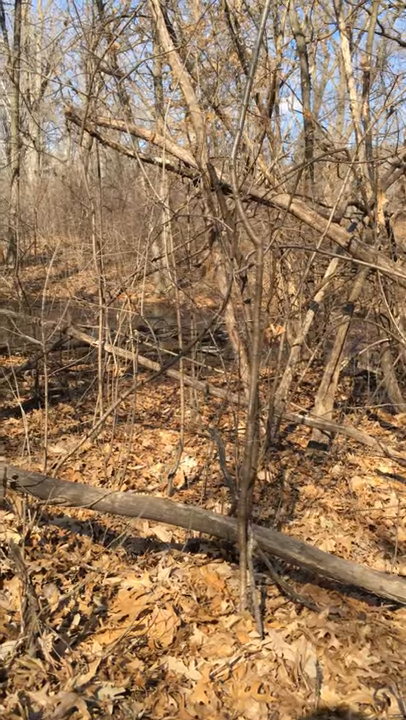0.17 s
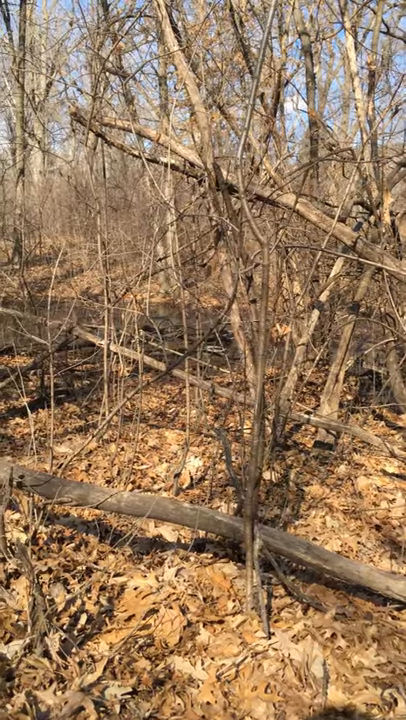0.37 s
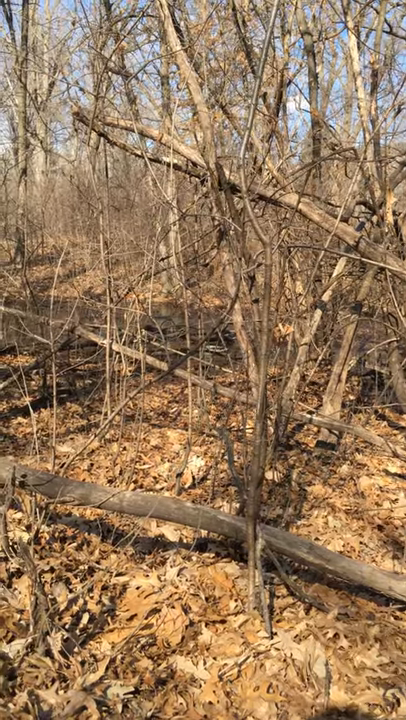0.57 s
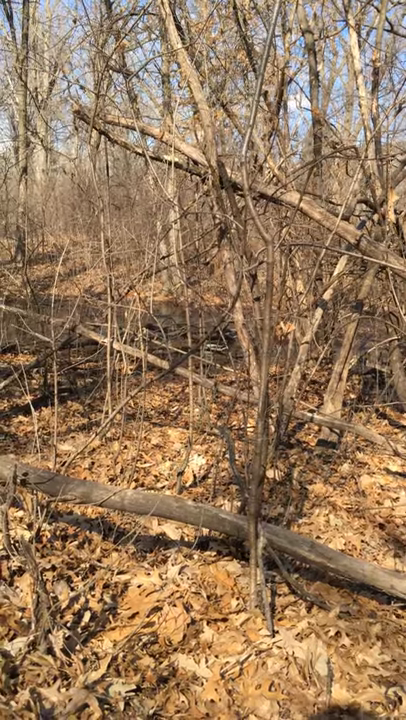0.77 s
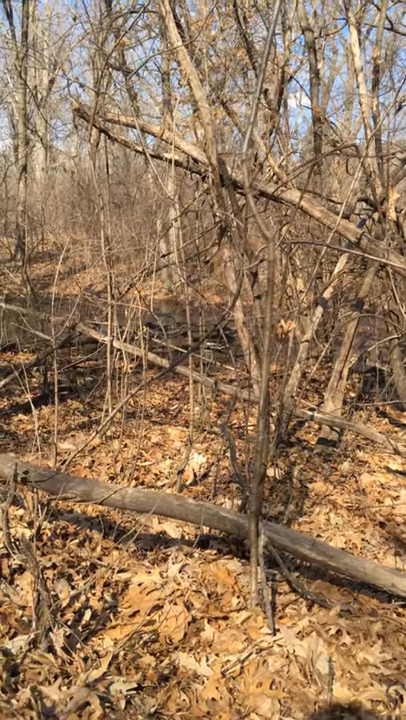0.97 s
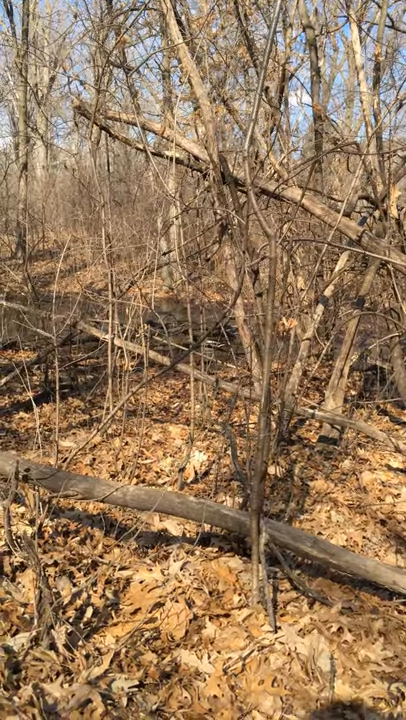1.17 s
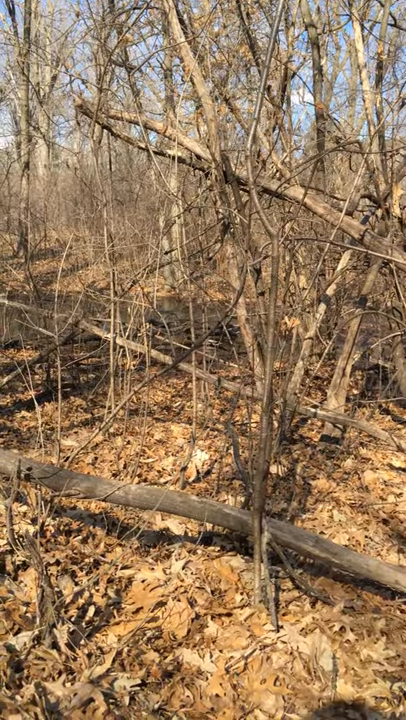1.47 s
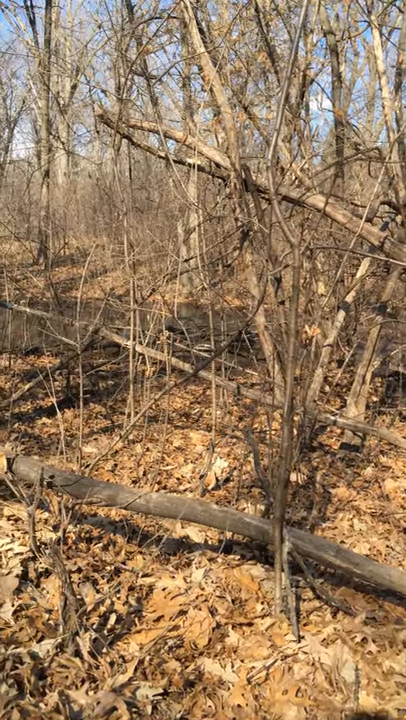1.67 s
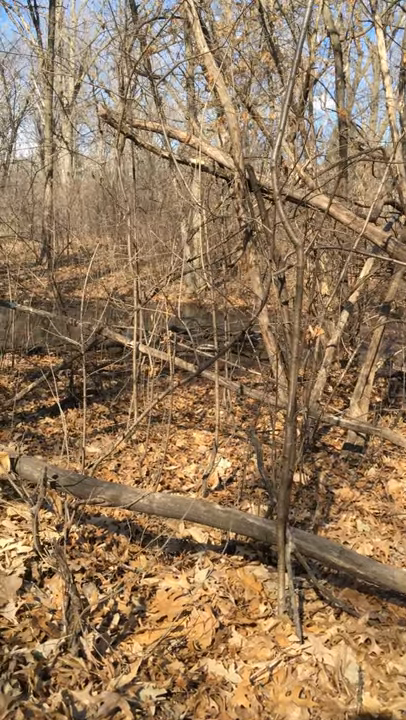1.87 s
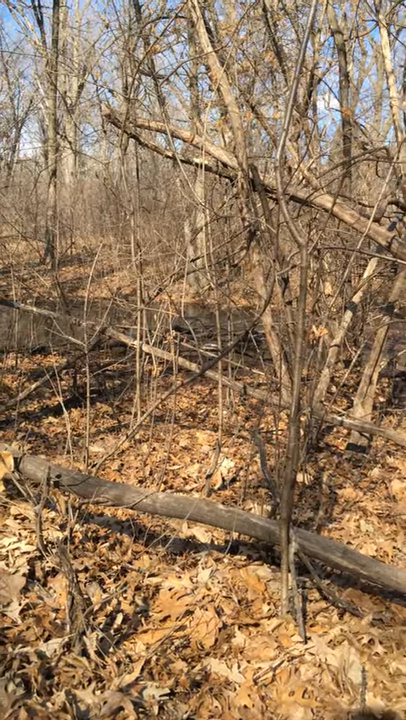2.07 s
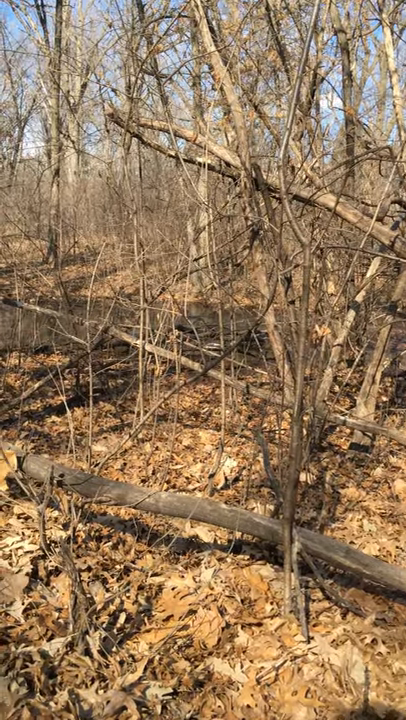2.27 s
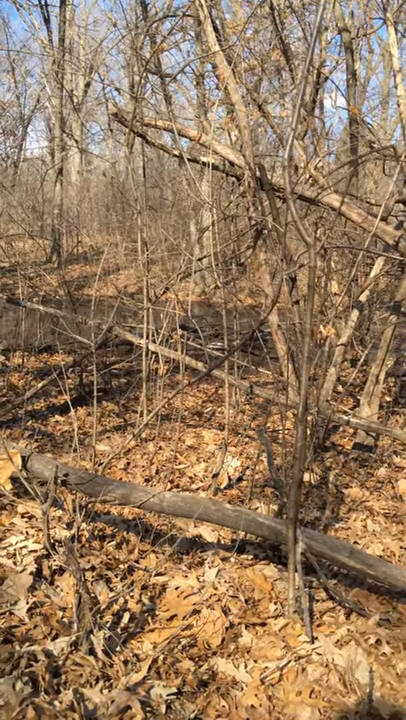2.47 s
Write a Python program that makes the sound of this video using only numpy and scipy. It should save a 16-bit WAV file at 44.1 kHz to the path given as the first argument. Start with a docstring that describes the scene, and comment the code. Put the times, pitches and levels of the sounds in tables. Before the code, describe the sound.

A frog gives one short, dry, pulsed creak in quiet woodland over low wind rumble

```python
"""Bare woodland on a still day: a low wind rumble, a far rush and a faint hiss, all coloured noise, run throughout.
First comes a short frog-like creak, an uneven row of dry pulses, each ringing, echoing and fading among the trunks.
Tiny noise ticks start during it, and the treble dips briefly now and then, twice with a pure blip inside the dip.
Later come a stray pulse, one dip of the whole sound, a far bird call of blurred noise bands
and, last, two thin gliding whistles."""
import sys
import numpy as np
from scipy import signal
from scipy.fft import rfft, irfft, next_fast_len
from scipy.io import wavfile
from scipy.ndimage import map_coordinates

SR = 44100
rng = np.random.default_rng(int(sys.argv[2]) if len(sys.argv) > 2 else 0)


def dump_mix(stems):
    """Bounce the given channels to the path in sys.argv[1] as a 16-bit WAV at rate SR."""
    frames = np.atleast_2d(stems).T  # one column per channel
    limited = np.clip(frames, -1, 1)  # hard clip at full scale
    pcm = np.round(limited * 32767).astype(np.int16)
    wavfile.write(sys.argv[1], SR, pcm)


N = 114660  # length of the scene in samples


def amp(db):
    """Turn decibels into a gain."""
    return 10 ** (np.asarray(db) / 20)


def unit(x):
    """Scale a sound to an rms (average strength) of 1."""
    return x / np.sqrt(np.mean(x ** 2) + 1e-20)


def filtered(x, response):
    """Multiply each frequency of x by the gain that response gives for it."""
    m = next_fast_len(len(x) + 8192)  # spare room so the end does not wrap onto the start
    gain = response(np.fft.rfftfreq(m, 1 / SR))
    return irfft(rfft(x, m) * gain, m)[:len(x)]


def noise(spectrum):
    """Make noise of rms 1, coloured by points of frequency and level."""
    point_hz, point_db = np.transpose(spectrum)

    def colour(hz):
        return amp(np.interp(np.log(hz + 1), np.log(point_hz), point_db))

    return unit(filtered(rng.standard_normal(N), colour))


def wobble(rate):
    """Draw a smooth curve through random values, rate of them a second."""
    knots = rng.standard_normal(int(N * rate / SR) + 4)
    return map_coordinates(knots, [np.arange(N) * rate / SR])


def add(track, s, sound):
    """Mix a sound into the track, starting at s seconds."""
    part = track[max(0, round(s * SR)):][:len(sound)]
    part += sound[:len(part)]


WOODS_T60_S, WOODS_RISE_S = 0.51, 0.0081  # time to fade by 60 dB, and time scale of the build-up


def woods(x):
    """Many trunks scatter a sound into a diffuse tail, here noise that builds up and dies away."""
    t = np.arange(SR) / SR
    fade = amp(-60 * t / WOODS_T60_S)
    tail = rng.standard_normal(SR) * fade * (1 - np.exp(-t / WOODS_RISE_S))
    return signal.fftconvolve(x, tail / np.linalg.norm(tail))[:N]


# Tone colours of the rumble, the rush and the hiss.
# Each row: frequency in Hz, relative level in dB per Hz.
RUMBLE_COLOUR = [(20, -41), (30, -28.5), (40, -12.5), (52, -5), (68, 1), (95, -4.5), (135, -7), (195, -15),
                 (260, -28), (400, -41), (900, -76)]
RUSH_COLOUR = [(100, -9), (300, 1.5), (450, -3.5), (680, 0.5), (950, 0.5), (1300, -5.5), (1800, -12),
               (2600, -19), (4500, -26.5), (9000, -51)]
HISS_COLOUR = [(500, 0), (3500, -5.5), (4900, -8), (5900, -1), (7800, -5), (9500, -1.5), (10400, -4.5),
               (11600, -0.5), (15500, 1)]
# How loud the rumble is as time passes. Each row: time in seconds, level in dB.
RUMBLE_LEVEL = [(0, -39.5), (.2, -42.5), (.54, -42.5), (.63, -41), (.82, -42), (.92, -39.5), (1.03, -43.5),
                (1.2, -40), (1.45, -40), (1.7, -42), (1.88, -40), (2.1, -42.5), (2.33, -42), (2.6, -41)]
RUSH_DB, HISS_DB = -61.5, -70
RUSH_SWAY_DB, RUSH_SWAY_RATE = 0.62, 4.86  # typical sway, and random values a second


def air():
    """Low wind rumble that swells gently, a far rush that sways and an even hiss, each coloured noise."""
    rumble_db = np.interp(np.arange(N) / SR, *np.transpose(RUMBLE_LEVEL))
    rumble = noise(RUMBLE_COLOUR) * amp(rumble_db)
    rush = noise(RUSH_COLOUR) * amp(RUSH_DB + RUSH_SWAY_DB * wobble(RUSH_SWAY_RATE))
    return rumble + rush + amp(HISS_DB) * noise(HISS_COLOUR)


# Pulses of the creak, and one stray later.
# Each row: start in seconds, level in dB (the direct pulse is then doubled), low resonance in dB,
# main resonance in dB, upper resonances in dB, noise in the woodland tail in dB.
PULSES = [(.0310, -50, 0.5, 6, -2, -5.5), (.0908, -51, 0, 7.5, -5, -6), (.1488, -49, 4.5, -4, 0, -4.5),
          (.2046, -50, -12, 4.5, 2, -4), (.2163, -52.5, 0.5, -2, 5, -1.5),
          (.2664, -48.5, -17, -7, -0.5, -3), (.2817, -53, -6, -4, -5, -3), (.3414, -51, -4, -3, -6, -6.5),
          (.3568, -54.5, -2, -4, -5, -5), (.4056, -53.5, -16, -8, -14, -6), (.4775, -54, -7, -8, -9, -3),
          (1.546, -67.5, -8, 6, -3, -5)]
# Resonances of the caller, in four groups.
# Each row: frequency in Hz, relative level in dB, time to fade by 60 dB in seconds.
LOW_MODES = [(2165, -4, 0.017)]
MID_MODES = [(2610, -3.5, 0.0075), (3110, -7.5, .011)]
MAIN_MODES = [(3648, 0, 0.013)]
UPPER_MODES = [(4010, -4.5, 0.01), (4390, -4.5, 0.0096)]
# Tone colour of the rasp. Each row: frequency in Hz, relative level in dB.
RASP_COLOUR = [(1000, -35), (1900, -3.5), (2400, -2), (4400, -5.5), (5100, -11), (9000, -29), (15000, -40)]
# Echoes from the ground and a near trunk. Each row: average delay in seconds, level in dB.
ECHOES = [(.0046, -11), (0.011, -10)]
ATTACK_S, RASP_DB, RASP_T60_S = 0.001, -9.5, 0.019
PITCH_SCATTER, ECHO_SCATTER = 0.0066, 0.033  # typical random change, as a fraction
CREAK_TOP_HZ = 5030  # upper edge of the pulses
WOODS_DB, TAIL_RING_DB = -1, -8.5  # level of the tail, and share of the pulse that feeds it


def creak():
    """Each pulse rings the resonances in its own balance, with a short rasp, two echoes and a broad tail."""
    out, t = np.zeros(N), np.arange(SR // 16) / SR
    for s, db, low_db, main_db, upper_db, tail_db in PULSES:
        pulse = amp(RASP_DB - 60 * t / RASP_T60_S) * noise(RASP_COLOUR)[:len(t)]
        groups = (LOW_MODES, low_db), (MID_MODES, 0), (MAIN_MODES, main_db), (UPPER_MODES, upper_db)
        for modes, group_db in groups:
            for hz, level, t60 in modes:
                pitch = hz * (1 + PITCH_SCATTER * rng.standard_normal())
                ring = np.sin(2 * np.pi * (pitch * t + rng.random()))
                pulse = pulse + amp(group_db + level - 60 * t / t60) * ring
        pulse = 2 * amp(db) * pulse * (1 - np.exp(-t / ATTACK_S))
        pulse = filtered(pulse, lambda hz: 1 / (1 + (hz / CREAK_TOP_HZ) ** 12) ** .5)
        add(out, s, pulse)
        for delay, echo_db in ECHOES:
            echo_delay = delay * (1 + ECHO_SCATTER * rng.standard_normal())
            add(out, s + echo_delay, amp(echo_db) * pulse)
        scatter = amp(db + tail_db - 60 * t / RASP_T60_S) * noise(RASP_COLOUR)[:len(t)]
        add(out, s, amp(WOODS_DB) * woods(scatter + amp(TAIL_RING_DB) * pulse))
    return out


# Faint ticks. Each row: start in seconds, level in dB before the fade, centre in Hz, spread in octaves.
TICKS = [(0.389, -63, 10900, .5), (.581, -67, 5500, 0.45), (1.411, -61, 10700, 0.58),
         (1.663, -73, 4000, 0.43)]
TICK_T60_S = 0.018  # time to fade by 60 dB


def ticks():
    """Tiny dry ticks, as of leaves and twigs: bands of noise that die away at once."""
    out, t = np.zeros(N), np.arange(SR // 16) / SR
    for s, db, centre_hz, octaves in TICKS:
        def bell(hz):
            return np.exp(-.5 * (np.log2((hz + 1) / centre_hz) / octaves) ** 2)

        band = filtered(rng.standard_normal(len(t)), bell)
        add(out, s, unit(band) * amp(db - 60 * t / TICK_T60_S))
    return out


# Brief dips of the level; an edge of 0 Hz dips the whole sound.
# Each row: middle in seconds, half length in seconds, depth in dB, lower edge in Hz.
DIPS = [(.458, .014, 20, 1703), (0.649, .015, 19.5, 2002), (0.862, 0.016, 17, 1802),
        (0.949, .011, 24, 2000), (0.992, 0.015, 21, 1498), (1.615, 0.035, 34, 0), (1.781, 0.013, 22, 2600),
        (2.316, 0.014, 28, 1996)]


def dips(x):
    """The level above some frequency sinks briefly and returns."""
    t = np.arange(N) / SR
    for s, half_s, depth_db, edge_hz in DIPS:
        upper = filtered(x, lambda hz: 1 / (1 + (edge_hz / (hz + 1)) ** 12))
        shape = np.clip(1 - abs(t - s) / half_s, 0, 1) ** 1.64  # 0 outside the dip, 1 in its middle
        x = x + upper * (amp(-depth_db * shape) - 1)
    return x


# Short pure blips heard during two dips.
# Each row: start in seconds, length in seconds, pitch in Hz, peak level in dB.
BLIPS = [(0.927, 0.045, 4220, -70.5), (1.764, 0.04, 2440, -68.5)]


def blips():
    """Two faint sine tones that swell and fade."""
    out = np.zeros(N)
    for s, length, hz, db in BLIPS:
        t = np.arange(int(length * SR)) / SR
        swell = np.sin(np.pi * t / length) ** 2
        add(out, s, amp(db) * swell * np.sin(2 * np.pi * hz * t))
    return out


# The parts of a far call.
# Each row: start in seconds, length in seconds, starting Hz, final Hz, level in dB before rise and fade.
FAR_CALLS = [(1.798, .36, 3356, 3230, -78.5), (1.86, 0.081, 2455, 2430, -76)]
FAR_BLUR_RATE, FAR_RISE_S = 400, .03  # random values a second (more give a wider band), rise time


def far_call():
    """A distant bird, smeared by the trees into narrow noise bands that sink and fade."""
    out = np.zeros(N)
    for s, length, start_hz, end_hz, db in FAR_CALLS:
        t = np.arange(int(length * SR)) / SR
        blur = (wobble(FAR_BLUR_RATE) + 1j * wobble(FAR_BLUR_RATE))[:len(t)]
        hz = np.linspace(start_hz, end_hz, len(t))
        tone = np.exp(2j * np.pi * np.cumsum(hz) / SR)
        band = unit((blur * tone).real)  # the blur shakes the tone's strength and phase
        add(out, s, amp(db) * band * np.minimum(t / FAR_RISE_S, 1) * np.sqrt(1 - t / length))
    return out


# Far bird whistles.
# Each row: start in seconds, length in seconds, starting Hz, held Hz, level in dB of the direct sound.
WHISTLES = [(2.42, .125, 6700, 7470, -77), (2.561, 0.054, 6000, 7230, -70)]
GLIDE_S, WHISTLE_EDGE_S = 0.015, 0.018  # time scale of the slide, and length of fade-in and fade-out
WHISTLE_WAVER, WHISTLE_WET_DB = .004, -7  # typical pitch change as a fraction, level of the woodland tail


def birds():
    """Thin far whistles, sine tones that slide to a held, slightly wavering pitch, with a woodland tail."""
    out = np.zeros(N)
    for s, length, start_hz, held_hz, db in WHISTLES:
        t = np.arange(int(length * SR)) / SR
        glide_hz = held_hz + (start_hz - held_hz) * np.exp(-t / GLIDE_S)
        hz = glide_hz * (1 + WHISTLE_WAVER * wobble(120)[:len(t)])
        swell = np.clip(np.minimum(t, length - t) / WHISTLE_EDGE_S, 0, 1)
        add(out, s, amp(db) * swell * np.sin(2 * np.pi * np.cumsum(hz) / SR))
    return out + amp(WHISTLE_WET_DB) * woods(out)


def scene():
    """The creak and the small sounds over the woodland air."""
    return (air() + creak() + ticks() + far_call() + birds())[None]


TOP_HZ = 15800  # nothing is kept from here up


def record(dry):
    """Apply the brief dips, add the blips, then cut off the highest treble."""
    return filtered(dips(dry[0]) + blips(), lambda hz: hz < TOP_HZ)[None]


dry = scene()
out = record(dry)
dump_mix(out)
```